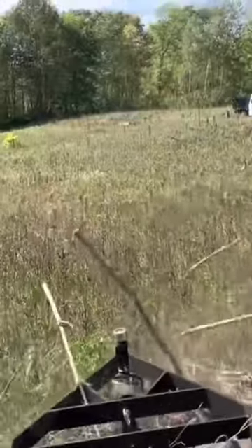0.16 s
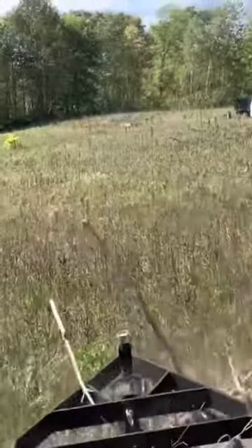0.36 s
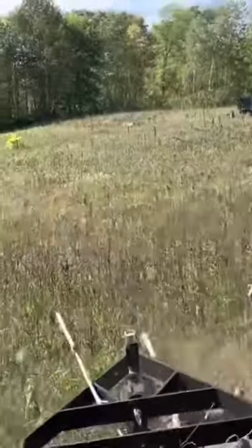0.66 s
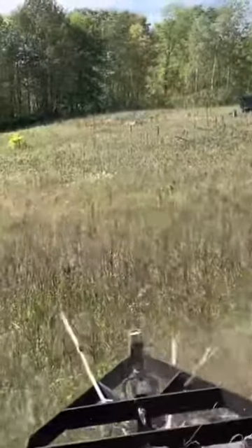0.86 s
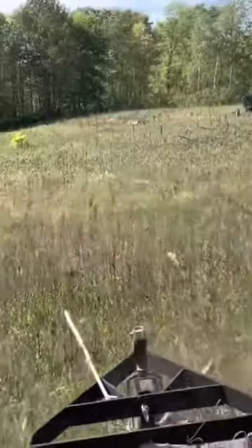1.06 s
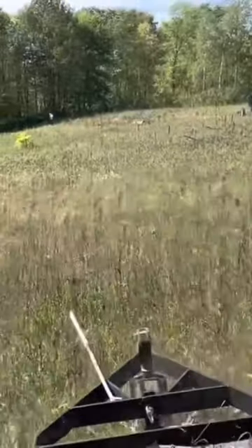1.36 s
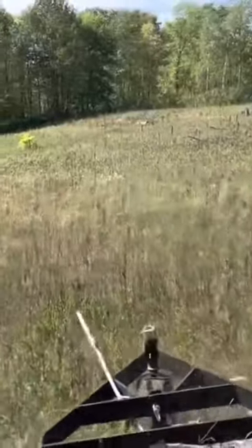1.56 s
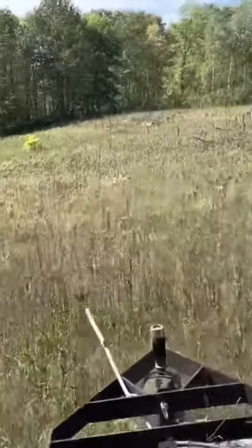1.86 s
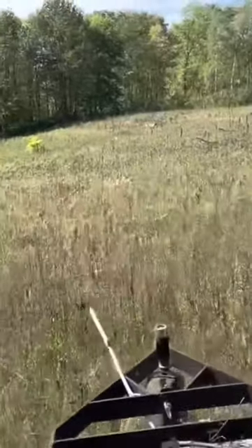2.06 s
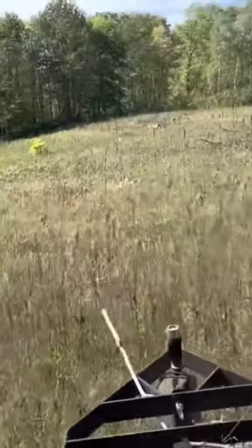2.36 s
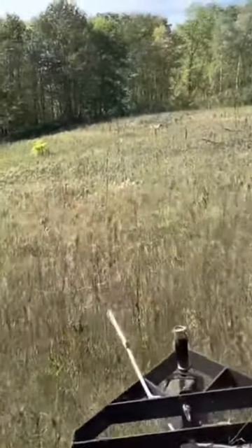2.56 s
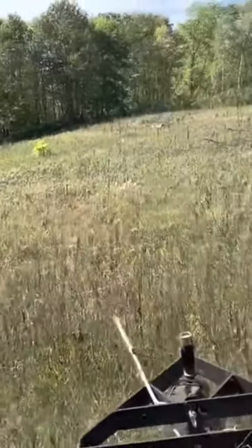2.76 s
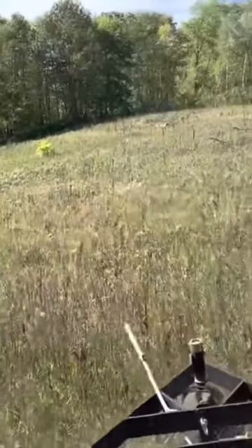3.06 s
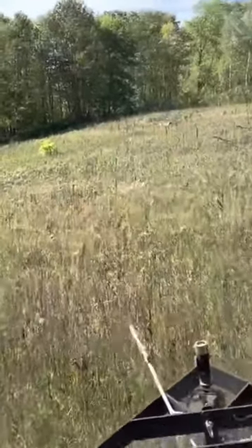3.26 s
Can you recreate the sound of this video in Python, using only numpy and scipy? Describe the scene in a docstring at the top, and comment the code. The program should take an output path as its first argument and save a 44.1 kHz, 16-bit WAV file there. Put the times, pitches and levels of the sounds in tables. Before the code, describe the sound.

A rotary brush cutter behind a tractor engine roars steadily in an open field, shredding stems; heavy stick cracks come early and around one second, then it thins before another sharp crack. Close stereo microphone at the driver's seat.

```python
"""Open field of tall scrub, from the seat of a tractor driving a rotary brush cutter.
Blades and engine body roar (noise in flickering half-octave bands) over low engine orders (wavering sines)
and gear whine (narrow noise). Stems shred in random puffs; sticks crack and ring the steel deck; clods thump
and knock the frame, faint ticks sound and the frame rumbles. Stereo likeness varies with pitch."""
import sys
import numpy as np
from scipy import signal
from scipy.fft import rfft, irfft, next_fast_len
from scipy.io import wavfile

SR = 44100
rng = np.random.default_rng(int(sys.argv[2]) if len(sys.argv) > 2 else 0)


def to_wav(s):
    """Save 16-bit WAV."""
    ch = np.atleast_2d(s).T  # columns
    pcm = np.round(np.clip(ch, -1, 1) * 32767)  # PCM
    wavfile.write(sys.argv[1], SR, pcm.astype(np.int16))


N = 150822


def from_db(db):
    """Gain of a level in dB."""
    return 10 ** (np.asarray(db) / 20)


def rms_one(x):
    """Scale to rms 1."""
    return x / np.sqrt(np.mean(x ** 2) + 1e-20)


def in_time(rows):
    """Columns of a breakpoint curve at every sample."""
    time_s, *columns = np.transpose(rows)
    return [np.interp(np.arange(N) / SR, time_s, c) for c in columns]


def at_hz(points, hz):
    """Table read on a log-frequency axis."""
    table_hz, value = np.array(points).T
    return np.interp(np.log(hz + 1), np.log(table_hz), value)


def drift(rate_hz):
    """Low-passed noise of rms 1, made at SR / 40 and interpolated."""
    r = np.exp(-80 * np.pi * rate_hz / SR)
    noise = rng.standard_normal(N // 40 + 2002)
    slow = signal.lfilter([1], [1, -2 * r, r * r], noise)[2000:]  # start-up dropped
    return np.interp(np.arange(N) / 40, np.arange(len(slow)), rms_one(slow))


def decay_per_sample(t60_s):
    """Gain per sample that falls 60 dB in t60_s."""
    return from_db(-60 / (t60_s * SR))


def ring(x, hz, t60_s):
    """Two-pole resonator: a unit click starts a decaying sine of initial height 1."""
    r, w = decay_per_sample(t60_s), 2 * np.pi * hz / SR
    return signal.lfilter([0, np.sin(w)], [1, -2 * r * np.cos(w), r * r], x + 1e-18)


def puff_envelope(clicks, t60_s):
    """One-pole decay: each click starts an exponential fall."""
    return signal.lfilter([1], [1, -decay_per_sample(t60_s)], clicks + 1e-18)


def band(x, low_hz, high_hz):
    """Band-pass."""
    return signal.sosfilt(signal.butter(2, [low_hz, high_hz], "band", fs=SR, output="sos"), x)


# roar spectrum before scaling: pitch_hz, density_db [dB per Hz]
ROAR_SPECTRUM = [(30, -45), (50, -6), (75, -4), (180, -2), (300, -3), (450, -9), (800, -7.5), (1300, -10),
                 (2100, -13), (2600, -18), (3200, -15.5), (4200, -26), (5500, -30), (7500, -26),
                 (9500, -39.5), (12000, -40.5), (14000, -40), (15700, -13)]
# roar level: time_s, level_db
ROAR_LEVEL_CURVE = [(0.0, -20.5), (0.17, -26), (0.38, -22.5), (0.76, -24), (1.29, -24.5), (1.47, -25.5),
                    (2.0, -24.5), (2.66, -23.5), (2.74, -22), (3.42, -22.5)]


def roar(patchy_db):
    """Blade wind and engine body: noise in overlapping half-octave bands, each flickering."""
    size = next_fast_len(N)
    hz = np.arange(size // 2 + 1) * SR / size
    tilt = from_db(at_hz(ROAR_SPECTRUM, hz)) * np.minimum(hz / 30, 1) ** 2
    spectrum = rfft(rng.standard_normal((2, size))) * tilt
    half_octave = np.maximum(2 * np.log2((hz + 1) / 30), -1)
    together, out = drift(9.0), 0
    for k in range(-1, 20):
        share = np.clip(1 - abs(half_octave - k), 0, 1)
        flicker = k / 13.4 * together + 0.58 * drift(17.0)  # common part grows with pitch
        out = out + irfft(spectrum * share, size)[:, :N] * from_db(patchy_db * flicker)
    return from_db(in_time(ROAR_LEVEL_CURVE)[0]) * rms_one(out)


# engine load: time_s, order_level_db
ENGINE_LOAD = [(0, -34), (.07, -25), (.12, -43), (.2, -20.5), (.3, -19.5), (.36, -32), (.55, -37),
               (.8, -49), (1.6, -33), (2.1, -40.5), (2.9, -36), (3.42, -47)]
# shaft orders: shaft_multiple, level_db [re load], load_swing_share
SHAFT_ORDERS = [(1.996, -1, 0.22), (5, -3, 0.98), (7.02, -0.5, 0.53), (10, -6.5, 0.13), (10.58, -4, 0.11),
                (13.53, -5.5, 0.096), (29.94, -10, 0.64)]
TURNS_PER_S = 35.1
WAVER_DB, WAVER_HZ, WOBBLE_RAD = 2.5, 14, .5


def engine():
    """Orders of the shaft as sines, each wavering in level and phase."""
    load_db, = in_time(ENGINE_LOAD)
    mean_db = load_db.mean()
    shaft_rad, out = 2 * np.pi * TURNS_PER_S * np.arange(N) / SR, np.zeros((2, N))
    for multiple, order_db, share in SHAFT_ORDERS:
        level_db = mean_db + share * (load_db - mean_db) + order_db + WAVER_DB * drift(WAVER_HZ)
        wobble_rad = WOBBLE_RAD * drift(WAVER_HZ) + rng.uniform(0, 2 * np.pi, (2, 1))
        out += np.sqrt(2) * from_db(level_db) * np.sin(multiple * shaft_rad + wobble_rad)
    return out


# gears and pump: pitch_hz, width_hz, level_db
WHINE_BANDS = [(1048, 40, -47.5), (1349, 70, -39.5), (1586, 15, -41.5), (1613, 12, -44.5),
               (1873, 82, -42.5), (2490, 24, -64), (3126, 200, -45), (3880, 16, -56), (4270, 24, -57),
               (4680, 210, -53.5), (568, 15.3, -40.5), (494, 40, -43), (810, 12.5, -50)]


def whines():
    """Gears and pump: narrow bands of noise."""
    out = 0
    for hz, width_hz, db in WHINE_BANDS:
        noise = rng.standard_normal((2, N))
        out = out + from_db(db) * rms_one(band(noise, hz - width_hz / 2, hz + width_hz / 2))
    return out


SPLINTER_DB, SPLINTER_RATE_HZ = 0.5, 580


def splinters():
    """Noise broken into uneven grains by a fast level drift."""
    return rng.standard_normal((2, N)) * from_db(SPLINTER_DB * drift(SPLINTER_RATE_HZ))


# stem shredding: time_s, level_db
SHRED_LEVEL = [(0, -32), (.12, -38), (.5, -38), (.9, -40), (1.25, -39), (1.5, -36), (2.0, -60),
               (2.6, -37.5), (2.95, -40), (3.42, -45)]
SHREDS_PER_S, SHRED_SPREAD_DB, SHRED_T60_S = 140, 2.5, 0.12


def shredding():
    """Small stems snap at random, each a short dying puff of splinter noise."""
    sizes = from_db(SHRED_SPREAD_DB * np.minimum(rng.exponential(1, N), 3))
    born = rng.random(N) < SHREDS_PER_S / SR
    puffs = puff_envelope(sizes * born, SHRED_T60_S) * splinters()
    snaps = band(puffs, 1100, 6440) + from_db(-18) * band(puffs, 4800, 10300)
    return from_db(in_time(SHRED_LEVEL)[0]) * rms_one(snaps)


# sticks on blade and deck: start_s, low_db, main_db, upper_db, bright_db, high_db, top_db,
# hold_s, t60_s [limited to .02 .. .5]
STICK_CRACKS = [(0.0094, -28, -23.5, -21, -27, -47, -48, 0.012, 0.097),
                (0.036, -27, -25, -32, -49, -47, -47, 0.01, 0.16),
                (0.17, -28, -28, -45, -34, -42, -50, 0.014, 0.089),
                (0.196, -29, -28, -47, -42, -48, -51, 0.0045, 0.07),
                (0.2837, -12.5, -8, -14, -17, -22.5, -29, 0.0048, 0.038),
                (0.2925, -16, -13.5, -19, -34, -30, -45, 0.0026, 0.044),
                (0.3004, -22.5, -14, -33, -36, -44, -50, 0.0087, 0.099),
                (0.406, -19.5, -19.5, -22.5, -20.5, -34, -36, 0.0055, 0.048),
                (0.4165, -19.5, -22, -36, -38, -46, -41, 0.0035, 0.15),
                (0.496, -51, -28.5, -28.5, -26.5, -33.5, -52, 0.006, 0.2),
                (0.613, -43, -30, -39, -33.5, -37, -41, 0.007, 0.1),
                (0.623, -32, -28, -37, -31.5, -37, -34, 0.006, 0.071),
                (0.651, -25.5, -26, -35, -37, -45, -45, 0.0063, 0.076),
                (0.71, -44, -26.5, -37, -34, -40, -41, 0.0095, 0.14),
                (0.791, -44, -26.5, -38, -30.5, -37, -41, 0.0067, 0.16),
                (0.9744, -34, -20.5, -33, -37, -42, -44, 0.0086, 0.28),
                (1.0283, -19.5, -29, -33, -36, -49, -50, 0.01, 0.17),
                (1.104, -28, -16.5, -19.5, -24.5, -30, -30.5, 0.0062, 0.054),
                (1.117, -18, -12, -15, -37, -38, -47, 0.0024, 0.046),
                (1.1245, -13.5, -16, -32, -38, -44, -49, 0.0033, 0.064),
                (1.139, -39, -16, -14.5, -30, -32, -41, 0.003, 0.046),
                (1.1485, -28, -17, -31, -45, -46, -45, 0.006, 0.058),
                (1.166, -43, -20.5, -33, -35.5, -42, -43, 0.0047, 0.19),
                (1.2371, -33, -28.5, -27.5, -32, -36, -41, 0.0054, 0.07),
                (1.3176, -37, -24, -21.5, -22.5, -31, -37, 0.011, 0.087),
                (1.3944, -29, -29, -31, -29.5, -37, -51, 0.01, 0.15),
                (1.4391, -23, -12.5, -21.5, -29, -38, -38, 0.0034, 0.087),
                (1.4556, -33, -24.5, -38, -40, -41, -49, 0.0054, 0.14),
                (1.808, -30, -34, -35, -33, -34.5, -42, 0.01, 0.12),
                (2.153, -40, -32, -35, -35, -39, -49, 0.006, 0.23),
                (2.7386, -27, -36, -34, -31, -38, -32.5, 0.01, 0.1),
                (2.7794, -41, -31, -26, -29, -34, -38, 0.008, 0.16),
                (2.8278, -24.5, -19, -16.5, -13, -21.5, -23, 0.0055, 0.048),
                (2.839, -20.5, -25, -19.5, -22, -26, -30, 0.0045, 0.084),
                (2.8555, -31.5, -25.5, -39, -30.5, -37, -58, 0.0075, 0.6),
                (3.212, -29, -28.5, -34, -37.5, -39, -46, 0.0052, 0.12)]
# low, main, upper, bright, high, top: low_hz, high_hz
STICK_BANDS = [(300, 980), (900, 2430), (2300, 3495), (3600, 5200), (5000, 6640), (6800, 21800)]
# rise time constant of each band: attack_s
BAND_ATTACK_S = [
    [.003],
    [.0012],
    [.0006],
    [.0004],
    [.0004],
    [.0004],
]
# deck resonances: pitch_hz, level_db, t60_s
DECK_MODES = [(519, -40, 0.05), (920, -42, 0.04), (1322, -36, 0.05), (1590, -36, 0.05), (1903, -40, 0.04),
              (2082, -42, 0.035), (2450, -42, 0.03), (3210, -44, 0.025), (4020, -38, 0.02)]
FIRST_SNAP_DB, FIRST_SNAP_S = 4, .002  # the break starts harder
SPRAY_DB, SPRAY_T60_RATIO = -27.5, 2  # debris keeps rattling after each crack
FIBRES_PER_S, FIBRE_DB = 1200, 9  # single samples of noise lifted: fibres snapping


def cracks():
    """Each stick bursts into splinter noise and snapping fibres that hold, die away and ring the deck."""
    t, envelope = np.arange(SR // 2) / SR, np.zeros((len(STICK_BANDS), N + SR))
    for start_s, *band_db, hold_s, t60_s in STICK_CRACKS:
        fall_db = -60 * np.maximum(t - hold_s, 0) / np.clip(t60_s, .02, .5)
        burst = from_db(fall_db + FIRST_SNAP_DB * np.exp(-t / FIRST_SNAP_S))
        spray = from_db(SPRAY_DB + fall_db / SPRAY_T60_RATIO)
        rise = 1 - np.exp(-t / BAND_ATTACK_S)
        i = int(start_s * SR)
        envelope[:, i:i + len(t)] += rise * (burst + spray) * from_db(band_db)[:, None]
    envelope = envelope[:, :N]
    fibres = rng.random(N) < FIBRES_PER_S / SR
    grit = rms_one(splinters() * from_db(FIBRE_DB * fibres))
    out = 0
    for (low_hz, high_hz), e in zip(STICK_BANDS, envelope):
        out = out + band(grit * e, low_hz, high_hz) / band(grit, low_hz, high_hz).std()
    blows = grit * envelope[1]  # main band drives the deck
    for hz, db, t60_s in DECK_MODES:
        out = out + from_db(db) * ring(blows * from_db(2 * drift(7.6)), hz, t60_s)
    return out


# clods on the frame: centre_s, peak_db [alike layer], rate_hz [spectrum peaks at 1.41 times this]
CLOD_THUMPS = [(0.293, -11.5, 167), (.308, -15, 222), (.69, -14, 127), (1.127, -12, 402), (1.695, -12, 123),
               (1.797, -25, 150.2), (1.939, -24, 100), (2.166, -24, 90), (2.5, -27, 200), (2.694, -19, 90),
               (2.747, -19, 79.4), (2.764, -33, 79.4), (2.967, -16, 172)]


def thumps():
    """Clods knock the frame: dull single pushes, each a negative Gaussian-curvature pulse."""
    t, out = np.arange(N) / SR, 0
    for centre_s, db, hz in CLOD_THUMPS:
        u = (t - centre_s) * hz * 2 * np.pi
        out = out - from_db(db) * (1 - u * u) * np.exp(-u * u / 2)
    return out * from_db([[0], [-10]])  # alike, opposed


# small clods: pitch_hz of each frame resonance
FRAME_HZ = [90, 140, 220, 340, 1100, 1500]
KNOCKS_PER_S, KNOCK_DB, KNOCK_SPREAD_DB = 40, -36.5, 2.5  # KNOCK_DB before the layer split


def knocks():
    """Small clods hit at random, each ringing a frame resonance that falls 60 dB in 4.6 cycles."""
    sizes = from_db(KNOCK_SPREAD_DB * np.minimum(rng.exponential(1, (2, N)), 3))
    signs = rng.choice([-1, 1], N)
    hits = sizes * signs * (rng.random(N) < KNOCKS_PER_S / SR)
    dealt = rng.integers(0, len(FRAME_HZ), N)
    rings = sum(ring(hits * (dealt == k), hz, 4.6 / hz) for k, hz in enumerate(FRAME_HZ))
    return from_db(KNOCK_DB) * rms_one(rings) * from_db([[0], [-5]])  # alike, opposed


# faint ticks: start_s, level_db [before band-pass]
FAINT_TICKS = [(0.1096, -30), (0.675, -29), (0.9454, -30), (1.2156, -36), (1.557, -37), (1.8389, -32.5),
               (1.9889, -36), (2.149, -35), (2.4219, -34)]
TICK_T60_S = 0.034


def ticks():
    """Faint, thin bright clicks of decaying noise."""
    clicks = np.zeros(N)
    for start_s, db in FAINT_TICKS:
        clicks[int(start_s * SR)] = from_db(db)
    return band(puff_envelope(clicks, TICK_T60_S) * rng.standard_normal((2, N)), 5000, 15500)


# frame rumble: time_s, level_db
RUMBLE_LEVEL = [(0.0, -46), (0.71, -31), (0.77, -48), (1.14, -36), (1.3, -64), (1.52, -37), (1.7, -35),
                (1.9, -32), (2.48, -43), (2.72, -27), (2.9, -35), (3.42, -45)]


def rumble():
    """The frame shakes over rough ground: lumpy low noise."""
    lumps = band(rng.standard_normal((2, N)), 60, 124) * from_db(2.6 * drift(20.0))
    return from_db(in_time(RUMBLE_LEVEL)[0]) * rms_one(lumps)


def scene():
    """Two layers of the same machine: what is alike left and right, and what is opposed."""
    machine = engine() + whines() + roar(patchy_db=1.5) + rumble()
    return machine + shredding() + cracks() + ticks() + thumps() + knocks()


# left-right likeness by pitch: pitch_hz, likeness [-1 opposed .. 1 alike, limited to that range]
STEREO_LIKENESS = [(40, 0.8), (250, 0.74), (700, 0.56), (1300, 0.92), (1800, 0.34), (2100, 1), (2600, 0.24),
                   (3000, 0.2), (3600, 0.66), (4200, 0.84), (4800, 0.57), (5800, 0.75), (6300, -0.46),
                   (6900, -1.027), (8200, -1.0), (9000, -0.26), (9800, 0.82), (12300, 1.0), (12900, -0.79),
                   (13600, -1.63), (16000, -0.6)]
# left-right balance by pitch: pitch_hz, left_minus_right_db
STEREO_LEAN = [(60, -4.5), (110, 1.5), (200, -2.5), (360, 0.5), (650, -0.5), (1190, -2), (2160, -2.0),
               (3930, 4), (7140, 0), (13000, -2)]
BASS_CUT_HZ, TOP_CUT_HZ, ROUNDING = 31, 15850, 1.1  # ROUNDING: peak ceiling before the top cut


def record(dry):
    """Left and right share the sound by likeness at each pitch; deep bass and top cut, peaks rounded."""
    size = next_fast_len(N + 4096)
    hz = np.arange(size // 2 + 1) * SR / size
    alike = np.clip(at_hz(STEREO_LIKENESS, hz), -1, 1)
    half_lean_db = at_hz(STEREO_LEAN, hz) / 2
    both, opposed = rfft(dry, size) * np.sqrt([(1 + alike) / 2, (1 - alike) / 2])
    spectra = np.array([both + opposed, both - opposed]) * from_db([half_lean_db, -half_lean_db])
    pair = irfft(spectra, size)[:, :N]
    pair = signal.sosfilt(signal.butter(2, BASS_CUT_HZ, "high", fs=SR, output="sos"), pair)
    rounded = ROUNDING * np.tanh(pair / ROUNDING)
    return signal.sosfilt(signal.cheby2(12, 70, TOP_CUT_HZ, fs=SR, output="sos"), rounded)


dry = scene()
out = record(dry)
to_wav(out)
```